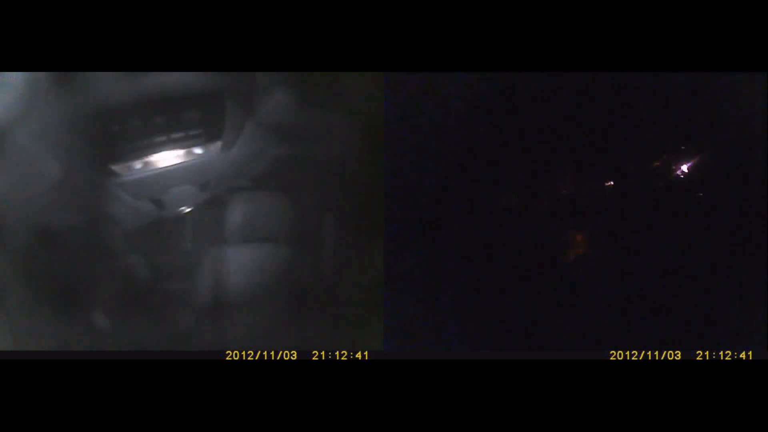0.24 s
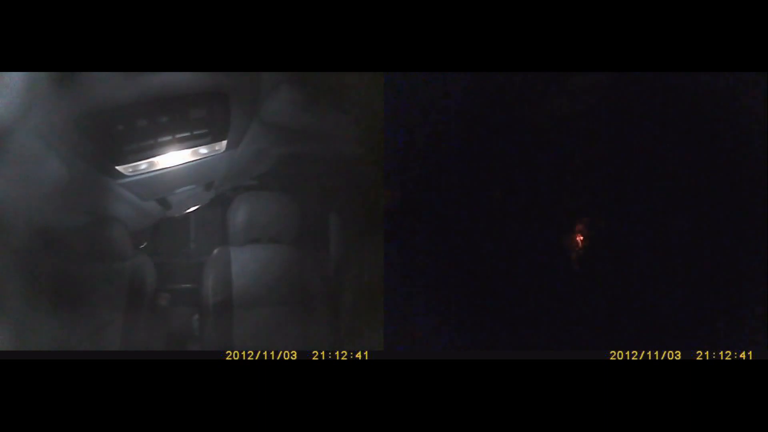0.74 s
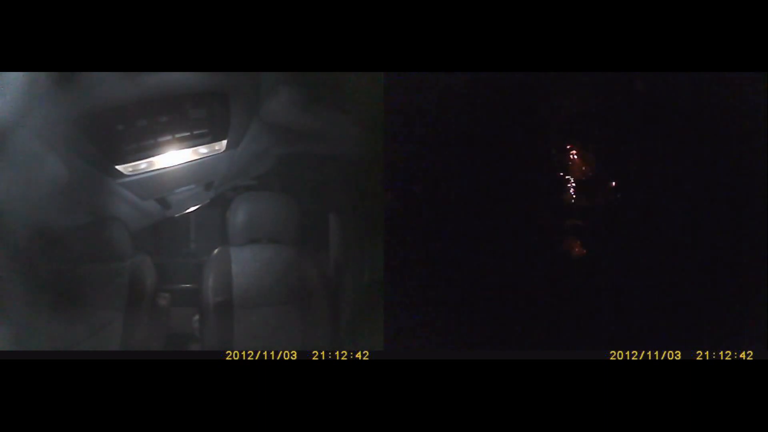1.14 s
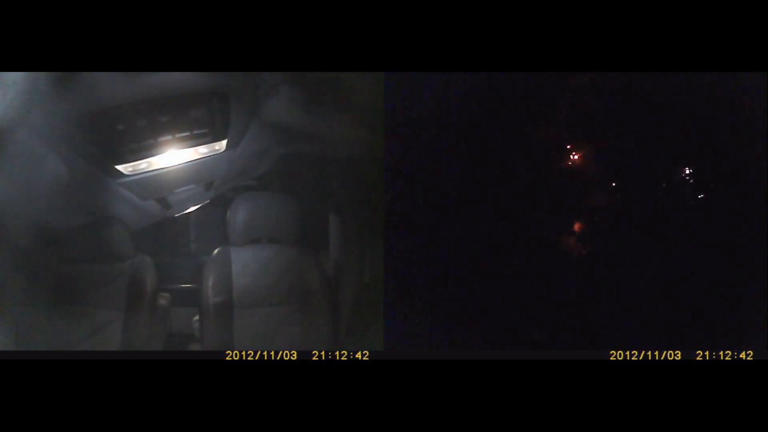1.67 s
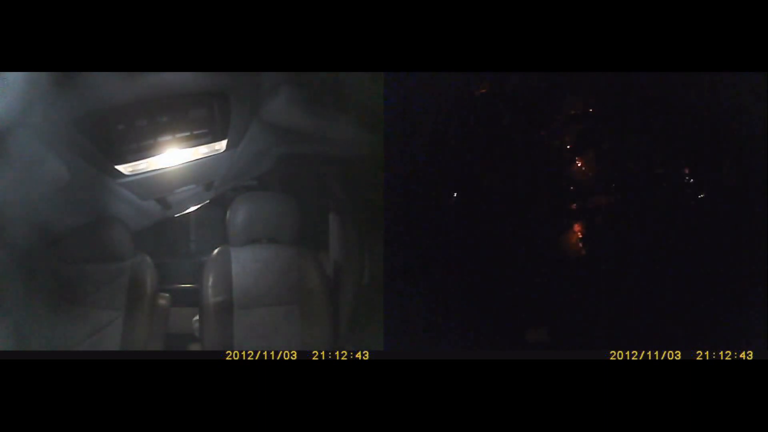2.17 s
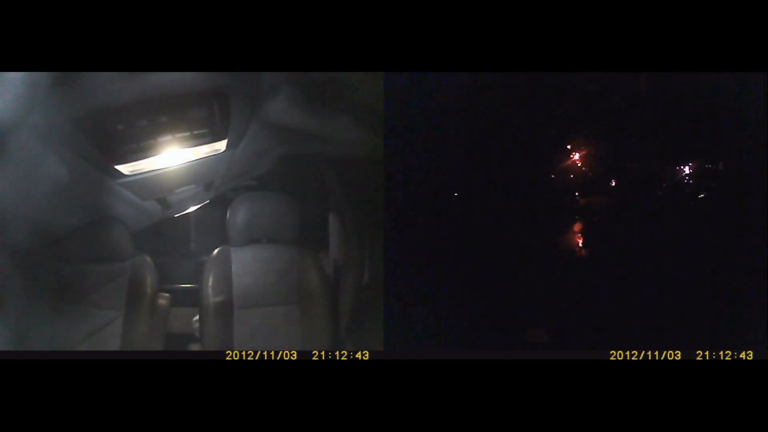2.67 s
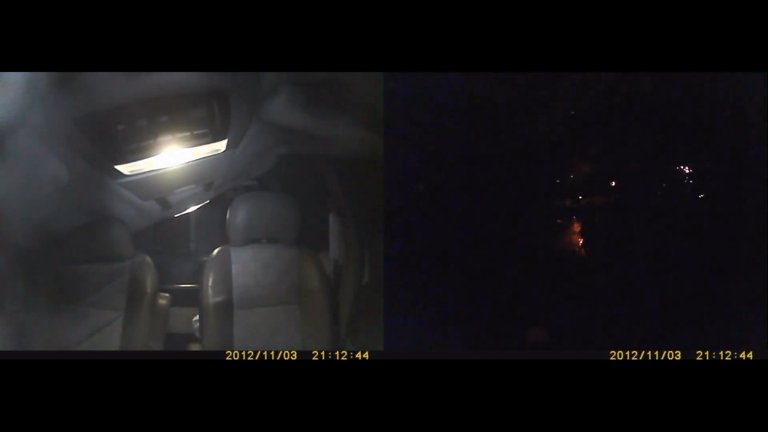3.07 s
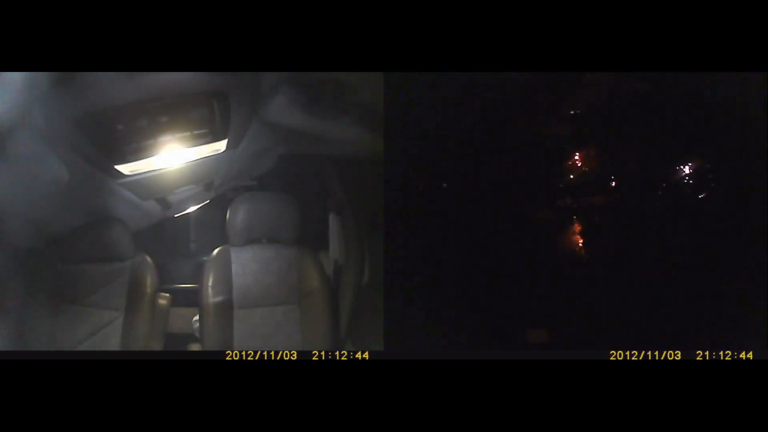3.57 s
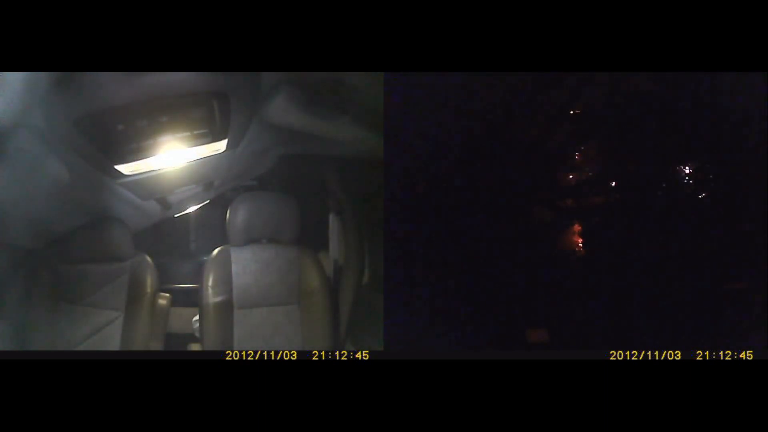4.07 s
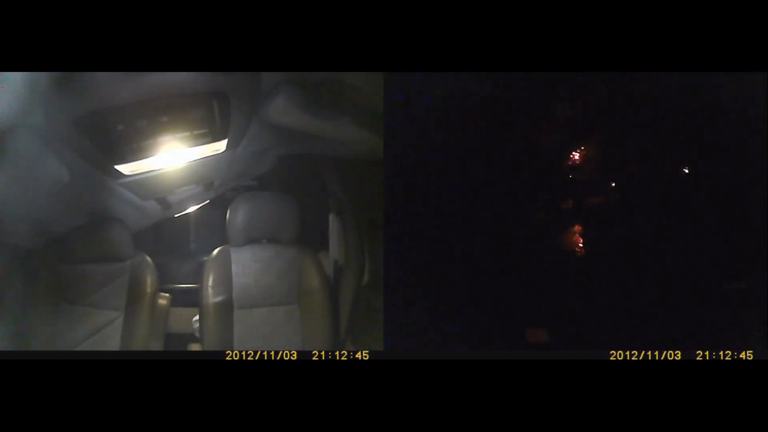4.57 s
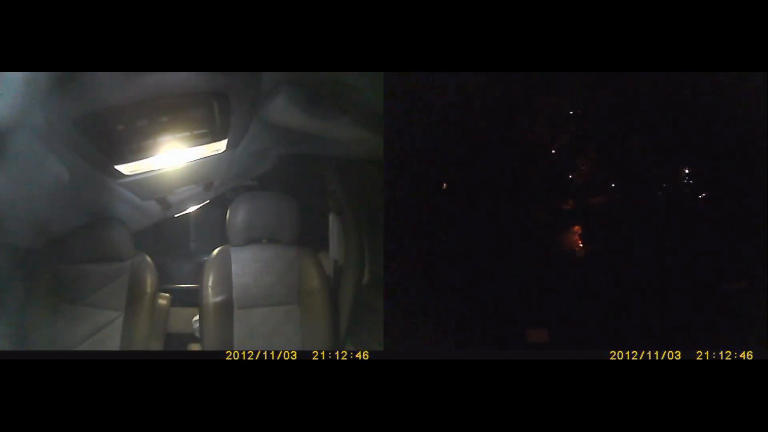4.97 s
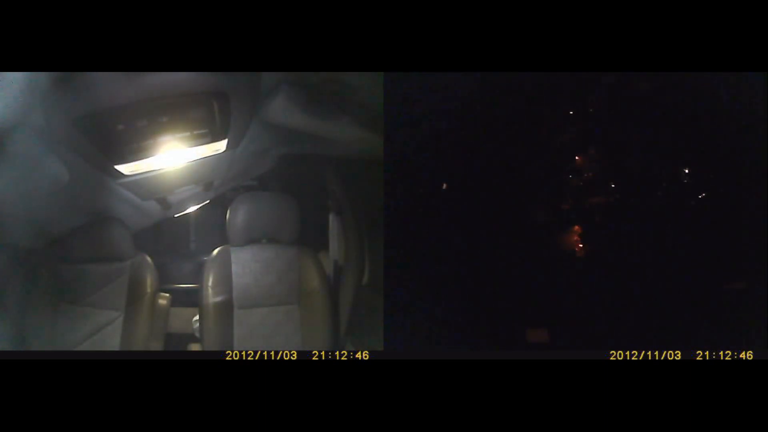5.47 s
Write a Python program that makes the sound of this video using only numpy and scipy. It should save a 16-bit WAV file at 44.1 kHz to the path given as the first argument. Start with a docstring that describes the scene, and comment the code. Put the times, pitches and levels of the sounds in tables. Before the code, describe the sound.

The microphone in the vehicle cabin is slammed straight away by splintering wood and crushing metal, breaking up in bursts. Dense battering on the panels follows, then isolated hollow bangs with short metallic rings. Scraping boughs slide and die down. Small knocks and ticks continue, with one harder hit late on, against dark wind, a faint bright patter that eases, and a low gust near the end.

```python
"""A tree crashes onto a van in a storm: dense noise grains crunch and splinter, heard inside the cabin.
The caving roof squeezes the cabin air and pins the microphone against its limit,
so the crash breaks through in ragged bursts. Limbs boom and clang as struck panels and ringing modes.
Branches scrape and settle as patchy noise; twigs and heavy drops tick and knock on the body.
Behind them is muffled wind, with one late gust and a fine patter of rain that eases off."""
import sys
import numpy as np
from scipy import signal
from scipy.fft import rfft, irfft
from scipy.io import wavfile
from scipy.ndimage import uniform_filter1d

SR = 44100
rng = np.random.default_rng(int(sys.argv[2]) if len(sys.argv) > 2 else 0)


def digitize_waveform(pressure):
    """Quantize a signal to 16-bit integers and store it at the path in sys.argv[1].

    Rows of a 2-D input are taken as channels; values are limited to [-1, 1].
    """
    field = np.atleast_2d(pressure).T
    bounded = np.clip(field, -1, 1)
    quanta = np.round(bounded * 32767).astype(np.int16)
    wavfile.write(sys.argv[1], SR, quanta)


N = 252693
TIME = np.arange(N) / SR  # s
STRIKE_TIME = np.arange(SR // 4) / SR  # s, the length of one struck sound
EDGE_HZ = 10420  # top of the microphone's band


def crash():
    """The falling tree: wood and metal break up on top of the slow pressure of the caving roof."""
    return crunch() + splinters() + snaps() + pressure()


def crunch():
    """Wood and sheet metal crush in countless small breaks, in three overlapping falls."""
    # first boughs, then the trunk, then the crown: start_s, level_db, hold_s, t60_s
    falls = [(0.016, 2.1, 0.34, 0.26), (0.411, -5, 0.21, 0.64), (0.756, -13.5, 0.18, 0.56)]
    # colour of the crunch: frequency_hz, level_db (per Hz, relative)
    crunch_spectrum = [(12, -40.5), (20, -9), (152, -5), (219, -9), (291, -1), (340, -8.5), (441, -5),
                       (705, -8.5), (1070, -14), (1280, -14.5), (1710, -33), (3920, -38), (4470, -37),
                       (4960, -44), (10000, -49.5), (13000, -90), (22000, -120)]
    rise_s, sag_db_per_s = 0.085, 9
    body_hz, body_full_s = 414, 0.57
    force = sum(swell(s, db, rise_s, hold, t60, sag_db_per_s) for s, db, hold, t60 in falls)
    breaks = grains(per_s=800, spread_db=2.6, wash=.7) * amp(1.2 * drift(hz=30))
    breaks = patchy(breaks, depth_db=2.5, length_s=0.029, width_hz=310)
    out = colour(breaks, crunch_spectrum) * force
    # the low body fills in as the trunk bears down
    missing_body = np.clip(1 - (TIME / body_full_s) ** 2, 0, 1)
    return out - dulled(out, body_hz, order=1) * missing_body


def splinters():
    """Wood fibres tear for as long as the tree is coming down, and shake the bright cabin trim."""
    fibres = grains(per_s=300, spread_db=3.5, wash=.3) * amp(2.5 * drift(hz=20))
    gain = swell(0, db=-38, rise_s=0.026, hold_s=0.89, t60=1.07)
    return evened(trim(fibres, 4200)) * gain


def snaps():
    """The first branches snap against the roof, each a very short pulse of pressure."""
    # start_s, peak_db
    first_snaps = [(.017, 8), (.039, 9.5), (.064, 5), (.073, 5)]
    out = np.zeros(N)
    for s, db in first_snaps:
        add(out, s, -amp(db) * signal.windows.hann(14))
    return out


def pressure():
    """The caving roof squeezes the cabin air; strong heaves keep the crunch from swinging the mic back."""
    # surges of cabin pressure: start_s, end_s
    heaves = [(-.02, .073), (.082, .104), (.124, .138), (.148, .167), (.183, .194), (.206, .213),
              (.229, .235), (.313, .331), (.378, .385), (.399, .419)]
    # pressures before easing, in the units of the dry signal
    heave_pressure, jolt_pressure, load_pressure = 2.2, 0.96, 0.26
    jolt_end_s, load_end_s, ease_s = 0.3, 0.69, 0.36

    def until(end_s):
        return np.clip((end_s - TIME) / ease_s, 0, 1)

    heaving = sum((TIME > start) & (TIME < end) for start, end in heaves) * 1.
    surge = heave_pressure * uniform_filter1d(heaving, size=220)  # edges smoothed over 5 ms
    # the first jolt, then the weight of the tree
    return surge + jolt_pressure * until(jolt_end_s) + load_pressure * until(load_end_s)


def battering(count=26):
    """Boughs batter the sheet metal in overlapping knocks, each on another spot with a crack of wood."""
    from_s, to_s = .43, 1.03
    level_db, fade_db_per_s, crack_db = -5.5, 14.5, -18  # crack relative to its knock
    out = np.zeros(N)
    for k, (late, spot, softness) in enumerate(rng.random((count, 3))):
        after_s = (k + late) / count * (to_s - from_s)
        knock = blow(700 * 2 ** spot, octaves=0.45, t60=0.044, rise=.001)
        knock += amp(crack_db) * crack(t60=0.077, ring_db=-5.5, hz=4200, tail_db=-6)
        add(out, from_s + after_s, amp(level_db - fade_db_per_s * after_s - 10 * softness) * knock)
    return out


def limbs():
    """Heavy wood strikes the roof: a boom of panels, a clang of modes, a crack of contact and a low thump."""
    # start_s, boom_db, ring_hz, t60_s, clang_db, clang_hz, crack_db, thump_db
    limb_strikes = [(.42, -14, 1000, 0.042, -10.5, 890, -24.5, -27),
                    (.452, -10, 1000, 0.094, 8.5, 502, -50, -25),
                    (.515, -5, 900, 0.33, -4, 794, -29.5, -24),
                    (0.569, -2.5, 463, 0.23, 0.5, 455, -25.5, -15),
                    (.615, -2, 350, 0.16, -13, 455, -18, -0.5), (.655, -10.5, 450, 0.11, -7, 586, -23, -15),
                    (.703, -0.5, 750, 0.089, 3, 740, -30, -17), (.808, -8, 754, 0.21, -2.5, 773, -42, -20),
                    (.849, -3, 750, 0.2, -9, 840, -22, -26), (.909, -11.5, 702, .11, -4.5, 750, -21.5, -28),
                    (.973, -8.5, 705, 0.16, -24, 840, -33, -31),
                    (1.017, -4.5, 580, 0.11, -4, 595, -28.5, -9.5),
                    (1.282, -4, 880, 0.078, -13, 880, -31, -10),
                    (1.472, -2, 850, .14, 6.5, 430, -21.5, 0.5),
                    (1.684, -21.5, 366, .06, -17, 455, -46, -28),
                    (2.061, -4, 1150, 0.027, -9.5, 1290, -31.5, -29),
                    (2.072, 3.5, 1200, 0.046, -1.5, 1410, -25.5, -14),
                    (2.111, -7.5, 560, .08, -25.5, 457, -39, -28),
                    (2.324, -17, 704, 0.1, -22, 730, -47, -40),
                    (2.499, -15.5, 275, 0.11, -26, 445, -57, -30),
                    (2.802, -20, 622, 0.13, -18, 592, -54, -56),
                    (3.66, -1.5, 1360, 0.037, -4, 685, -25.5, -19)]
    # a harder limb rings more of the roof: width of its ring at 0 dB, and the dB that double it
    width_octaves, widen_db = 1.38, 7
    out = np.zeros(N)
    for s, boom_db, ring_hz, t60, clang_db, clang_hz, crack_db, thump_db in limb_strikes:
        octaves = width_octaves * 2 ** (boom_db / widen_db)
        add(out, s, amp(boom_db) * blow(ring_hz, octaves, t60, rise=0.0037, sag=4.43))
        add(out, s, amp(clang_db) * clang(clang_hz, octaves=0.22))
        add(out, s, amp(crack_db) * crack(t60=0.059, ring_db=-8.5, hz=3080, tail_db=-7.5))
        add(out, s, amp(thump_db) * thump(hz=33.6, t60=0.077))
    return out


def branches():
    """Boughs rumble as they slide on the roof while their twigs scratch the paint in fits and starts."""
    # slides: start_s, level_db, hold_s, t60_s, scrape_db (relative to the rumble)
    slides = [(0.721, -25, 0.47, 0.69, -20.5), (1.304, -22.5, 0.026, 2.97, -25),
              (2.033, -23.5, 0.038, 1.63, -23.5), (2.673, -40.5, 0.14, 16, -30)]
    # colour of the rumble: frequency_hz, level_db (per Hz, relative)
    rumble_spectrum = [(12, -23), (20, 0), (38, -2.5), (65, -11), (117, -3.5), (263, -3.5), (340, -10.5),
                       (456, -5.5), (534, -5.5), (963, -13), (1430, -24.5), (1700, -37.5), (2200, -38),
                       (2860, -74), (4840, -120)]
    # colour of the scrape: frequency_hz, level_db (per Hz, relative)
    scrape_spectrum = [(1060, -43.5), (1800, 3.5), (2670, -3.5), (3530, 5), (3820, -7), (4450, -1.5),
                       (4990, -4), (9110, -11.5), (11000, -44)]
    rise_s = 0.043
    gains = np.array([swell(s, db, rise_s, hold, t60) for s, db, hold, t60, _ in slides])
    scrape_shares = amp([[row[-1]] for row in slides])
    # separate slides add up in energy
    sliding = np.linalg.norm(gains, axis=0)
    scraping = np.linalg.norm(gains * scrape_shares, axis=0)
    # rumble and scrape share the same jolts
    jolt = drift(hz=25)
    bumps = grains(per_s=450, spread_db=2.5, wash=.8) * amp(1.2 * jolt)
    scratches = grains(per_s=260, spread_db=3, wash=.7) * amp(2 * jolt)
    scratches = patchy(cabin(scratches), depth_db=6.5, length_s=0.09, width_hz=400)
    scrape = colour(scratches, scrape_spectrum)
    # a light touch makes hardly any treble
    bite = np.sqrt(scraping / scraping.max())
    # filtered forwards and backwards, so that the soft part stays in phase
    soft = dulled(scrape, 5000, order=4)
    soft = dulled(soft[::-1], 5000, order=4)[::-1]
    return sliding * colour(bumps, rumble_spectrum) + scraping * (soft + bite * (scrape - soft))


def twigs():
    """Twigs and heavy drops tick sharply as the panel swells in answer; debris skitters between them."""
    # twigs and drops: start_s, knock_db (base of boom and clang), ring_hz, tick_db, treble_edge_hz
    light_knocks = [(1.127, -18, 780, -44, 6000), (1.175, -18.5, 780, -37, 6000),
                    (1.299, -24.5, 900, -30, 7000), (1.441, -25, 600, -35, 8000),
                    (1.629, -21.5, 1080, -43.5, 5000), (1.869, -26, 970, -42, 8000),
                    (1.909, -22, 1000, -42, 5000), (2.173, -21.5, 765, -45, 8000),
                    (2.228, -23, 650, -44, 7000), (2.253, -27.5, 900, -39.5, 9000),
                    (2.301, -17.5, 880, -33, 7040), (2.362, -21.5, 646, -57, 5020),
                    (2.485, -23, 680, -39.5, 9000), (2.577, -37, 1000, -44, 7000),
                    (2.68, -20, 706, -33, 7300), (2.714, -21, 930, -47, 4000),
                    (2.771, -24.5, 860, -36.5, 7260), (3.026, -31.5, 750, -65, 3960),
                    (3.161, -37, 645, -43.5, 5000), (3.353, -17.5, 900, -27.5, 4800),
                    (3.537, -24, 900, -37.5, 5750), (3.628, -34, 670, -38.5, 4600),
                    (4.073, -30, 1050, -60, 4000), (4.265, -39, 700, -51.5, 4800),
                    (4.306, -33.5, 805, -45, 5100), (4.416, -32, 920, -45.5, 5000),
                    (4.539, -26, 900, -40.5, 5370), (4.646, -35, 730, -50, 5000),
                    (4.812, -30, 830, -54, 4500), (5.11, -26, 830, -34, 5840),
                    (5.21, -37.5, 1036, -57, 4000), (5.423, -30.5, 680, -42, 5340),
                    (5.53, -37, 900, -64, 4000)]
    # bits of bark and debris after the blows: start_s, tick_db
    skitters = [(1.253, -43), (1.345, -39.5), (1.361, -47.5), (1.377, -46), (1.425, -53), (1.801, -50.5),
                (2.138, -42), (2.469, -48)]
    boom_db, clang_db = 2, 0.5  # relative to the knock
    out = np.zeros(N)
    for s, knock_db, ring_hz, tick_db, edge_hz in light_knocks:
        boom = blow(ring_hz, octaves=0.71, t60=0.074, rise=0.0044)
        add(out, s, amp(knock_db + boom_db) * boom)
        add(out, s, amp(knock_db + clang_db) * clang(ring_hz, octaves=0.57))
        tick = crack(t60=0.016, ring_db=-7, hz=rng.uniform(3200, 4600), tail_db=-6)
        add(out, s, amp(tick_db) * dulled(tick, edge_hz, order=3))
    for s, tick_db in skitters:
        add(out, s, amp(tick_db) * crack(t60=0.025, ring_db=-16, hz=3800, tail_db=1))
    return out


def storm():
    """The background weather: wind, its buffeting of the van, and fine rain."""
    return wind() + buffeting() + rain()


def wind():
    """Wind roars through the closed body as dark noise, its level wandering a little."""
    # colour of the wind: frequency_hz, level_db (per Hz, relative)
    wind_spectrum = [(12, -33), (20, -18.5), (167, -13), (234, -5), (314, -10.5), (456, -12), (676, -14.5),
                     (1040, -24.5), (1430, -33), (1570, -44.5), (2200, -45), (2860, -68), (4840, -120)]
    level_db = -41.5 - 1.35 * drift(hz=0.98)
    eddies = grains(per_s=600, spread_db=2.5, wash=1.6) * amp(.6 * drift(hz=14))
    eddies = patchy(eddies, depth_db=-1.0, length_s=0.029, width_hz=150)
    return colour(eddies, wind_spectrum) * amp(level_db)


def buffeting():
    """Very low noise from the wind pushing on the body; one gust rocks the van."""
    gust_s, gust_width_s, gust_db = 5.38, 0.11, 9
    level_db = -50.5 + gust_db * np.exp(-((TIME - gust_s) / gust_width_s) ** 2)
    # frequency_hz, level_db (per Hz, relative)
    spectrum = [(15, -16.0), (42, -6.5), (70, -20.0), (140, -14.5), (260, -39.0), (900, -98.0)]
    return colour(rng.standard_normal(N), spectrum) * amp(level_db)


def rain():
    """Fine rain patters on the glass as small bright grains, and steadily eases off."""
    # colour of the patter: frequency_hz, level_db (per Hz, relative)
    patter_spectrum = [(1100, -23), (1700, -7.5), (3500, -5), (4000, -15.5), (4500, -2.5), (5100, -21.5),
                       (13000, -53)]
    middle_db, ease_db_per_s = -62.5, 2.5  # level midway through the scene
    drops = grains(per_s=120, spread_db=2.5, wash=1.3) * amp(1.2 * drift(hz=9))
    drops = patchy(cabin(drops), depth_db=3.5, length_s=0.055, width_hz=400)
    level_db = middle_db - ease_db_per_s * (TIME - TIME.mean())
    return colour(drops, patter_spectrum) * amp(level_db)


def blow(ring_hz, octaves, t60, rise, sag=0):
    """A struck panel: resonances near ring_hz swell and die, sinking by sag octaves/s as it dents."""
    # resonances of the body panels: frequency_hz, width_hz, level_db
    panel_modes = [(260, 55, 3), (457.8, 2.1, 9), (583, 9.8, -0.5), (740, 47, -4), (998, 8.2, -0.5),
                   (1270, 9.7, -3.5)]
    t = STRIKE_TIME
    hz = bins(t)
    panels = np.sqrt(sum(amp(db) ** 2 / (1 + ((hz - f) / width) ** 2) for f, width, db in panel_modes))
    near = 1 / (1 + (np.log2(hz / ring_hz) / max(octaves, .1)) ** 2)
    lining = 1 / np.sqrt(1 + (hz / 1550) ** 14)  # the roof lining soaks up the treble
    random_phase = np.exp(2j * np.pi * rng.random(len(hz)))
    field = signal.hilbert(irfft(panels * near * lining * random_phase, len(t)))
    # the same energy sloshes between the modes, so the ring holds steady as it decays
    field /= np.sqrt(uniform_filter1d(abs(field) ** 2, size=260) / 2 + 1e-20)
    slowed_time = np.cumsum(2 ** (-sag * t)) / SR
    ring = np.interp(slowed_time, t, field.real)
    return ring * (1 - np.exp(-t / rise)) * amp(-60 * t / max(t60, .01))


def clang(near_hz, octaves):
    """The roof's modes ring as clear tones; each spot favours those near one pitch, slightly detuned."""
    # clear modes of the sheet-metal roof: frequency_hz, level_db, t60_s
    roof_modes = [(452.3, 7.5, 0.097), (595, 0, 0.088), (721.4, -1, 0.059), (828, -4.5, 0.078),
                  (988, 5.5, 0.056), (1315, -6.5, 0.057)]
    t = STRIKE_TIME
    hz, db, t60 = np.transpose(roof_modes)[:, :, None]
    detune, sign = rng.uniform(-1.3, 1, (2, len(hz), 1))
    share = amp(db) / (1 + (np.log2(hz / near_hz) / octaves) ** 2)
    tuned_hz = hz * (1 + 0.02 * detune)
    tones = np.sign(sign) * np.sin(2 * np.pi * tuned_hz * t) * amp(-60 * t / t60)
    return (share * tones).sum(0) / np.linalg.norm(share) * (1 - np.exp(-t / 0.0014))


def crack(t60, ring_db, hz, tail_db):
    """The snap of contact, brightest near hz: it chatters briefly, leaving a cabin tail and ringing trim."""
    # colour of a tick: frequency_hz, level_db (per Hz, relative)
    tick_spectrum = [(880, -11.5), (1350, 12), (1810, -5.5), (2640, -4.5), (3090, -3), (3620, -6.5),
                     (3950, -8), (4590, -6.5), (5880, -12.5), (10000, -15.5), (13000, -52), (22000, -120)]
    hold_s, tail_t60_s, own_octaves = .005, .1, 2.8
    t = STRIKE_TIME
    chatter = amp(3.5 * evened(uniform_filter1d(rng.standard_normal(len(t)), size=70)))
    contact = amp(-60 * np.maximum(t - hold_s, 0) / t60)
    tail = amp(tail_db - 60 * t / tail_t60_s)
    fade = chatter * (contact + tail) * (1 - np.exp(-t / 0.00014))
    own_colour = 1 / np.sqrt(1 + (np.log2(bins(t) / hz) / own_octaves) ** 2)
    noise = irfft(rfft(rng.standard_normal(len(t))) * own_colour, len(t))
    snap = colour(noise, tick_spectrum) * fade
    sound = snap + amp(ring_db) * trim(snap, hz)
    return sound / np.sqrt(np.mean(sound[t < .01] ** 2))  # unit level over the first 10 ms


def thump(hz, t60):
    """The whole roof flexes and pushes on the cabin air as a fast-dying low tone, with a dull shudder."""
    t = STRIKE_TIME
    # frequency_hz, level_db (per Hz, relative)
    spectrum = [(15, -12), (45, -6.0), (130, -4.5), (220, -9.0), (500, -65), (2000, -110)]
    shudder = colour(rng.standard_normal(len(t)), spectrum)
    flex = np.sin(2 * np.pi * hz * t)
    return (flex + amp(-2.0) * shudder) * amp(-60 * t / t60) * (1 - np.exp(-t / 0.00076))


def trim(x, favoured_hz):
    """What the trim rings with when x shakes it; each spot favours the resonances near one pitch."""
    # bright resonances of the cabin trim: frequency_hz, width_hz, level_db
    trim_modes = [(2680, 200, 12), (3580, 300, 11.5), (4380, 156, 16.5)]
    out = np.zeros(len(x))
    for hz, width, db in trim_modes:
        weight = 1 / (1 + (np.log2(hz / favoured_hz) / 0.52) ** 2)
        out += amp(db) * weight * signal.lfilter(*signal.iirpeak(hz, hz / width, SR), x)
    return out


def cabin(x):
    """Close reflections inside the cabin blur each snap: a decaying noise echo with a t60 of 30 ms."""
    reflections = rng.standard_normal(2048) * amp(-60 * TIME[:2048] / .03)
    return evened(signal.oaconvolve(x, reflections)[:N])


def grains(per_s, spread_db, wash):
    """Countless small snaps of uneven size over a smooth wash of noise."""
    size = amp(spread_db * np.minimum(rng.exponential(1, N), 4))
    pulses = size * rng.choice([-1, 1], N) * (rng.random(N) < per_s / SR)
    return evened(evened(pulses) + wash * rng.standard_normal(N))


def patchy(x, depth_db, length_s, width_hz):
    """Lets each part of the spectrum surge and sink on its own, as the contact points shift."""
    z = signal.stft(x, nperseg=512)[2]
    field = rng.standard_normal(z.shape[::-1]).T
    # smooth the random gains along frequency, then along time
    for axis, spread in enumerate([width_hz * 512 / SR, length_s * SR / 256]):
        smoother = np.expand_dims(signal.windows.gaussian(41, spread / 2), 1 - axis)
        field = signal.fftconvolve(field, smoother, "same")
    gain = amp(depth_db * np.clip(evened(field), -2, 2))
    return evened(signal.istft(z * gain)[1][:len(x)])


def drift(hz):
    """Slow chance of unit size, with wiggles up to about hz a second."""
    white = rng.standard_normal(N)
    return evened(irfft(rfft(white) / (1 + (bins(white) / hz) ** 4), N))


def swell(start, db, rise_s, hold_s, t60, sag_db_per_s=0):
    """A gain that rises to db, holds while sagging slowly, then dies away."""
    held = np.maximum(TIME - start - rise_s, 0)
    fall_db = sag_db_per_s * held + 60 * np.maximum(held - hold_s, 0) / t60
    return np.clip((TIME - start) / rise_s, 0, 1) * amp(db - fall_db)


def colour(x, spectrum):
    """Gives x a spectrum of (Hz, dB) points, at unit level."""
    hz, db = np.transpose(spectrum)
    gain = amp(np.interp(np.log(bins(x)), np.log(hz + 1), db))
    return evened(irfft(rfft(x) * gain, len(x)))


def dulled(x, edge_hz, order):
    """Rolls off the treble above edge_hz."""
    return signal.sosfilt(signal.butter(order, min(edge_hz, EDGE_HZ), fs=SR, output="sos"), x)


def above(x, hz, order):
    """Rolls off everything below hz."""
    return signal.sosfilt(signal.butter(order, hz, "highpass", fs=SR, output="sos"), x)


def amp(db):
    """Amplitude ratio of a level in dB."""
    return 10 ** (np.asarray(db) / 20)


def evened(x):
    """Brings x to unit RMS level."""
    return x / np.sqrt(np.mean(x ** 2) + 1e-20)


def bins(x):
    """Frequencies in Hz of the spectrum of x, kept just above zero."""
    return np.fft.rfftfreq(len(x), 1 / SR) + 1e-3


def add(mix, s, sound):
    """Mixes sound in at s seconds, cut off at the end of the mix."""
    part = mix[max(round(s * SR), 0):][:len(sound)]
    part += sound[:len(part)]


def overload(x, limit):
    """The microphone runs out of travel and flattens the wave, with rounded corners."""
    return x / (1 + abs(x / limit) ** 2.8) ** (1 / 2.8)


def scene():
    """Everything reaches one microphone inside the cabin."""
    sound = crash() + battering() + limbs() + branches() + twigs() + storm()
    return np.array([sound, sound])


def record(dry, limit=0.5, leak_db=-23, sag_hz=0.035, dull_hz=8500):
    """One overloaded, dull microphone: treble leaks past its limit, its offset sags, its band is limited."""
    spread_db, spread_hz, spread_s = -17, 3500, .002
    squashed = dulled(overload(dry, limit), dull_hz, order=1)
    leak = amp(leak_db) * above(dry, 1950, order=2)
    out = above(squashed + leak, sag_hz, order=1)
    # a faint, slightly delayed treble, of opposite sign left and right, widens the sound a little
    delayed = np.interp(TIME - spread_s, TIME, out[0])
    side = amp(spread_db) * above(delayed, spread_hz, order=2)
    out = out * amp([[-.1], [.1]]) + np.array([side, -side])
    band_limit = signal.firwin(401, EDGE_HZ, window=("kaiser", 9), fs=SR)
    return signal.oaconvolve(out, band_limit[None], "same")


dry = scene()
out = record(dry)
digitize_waveform(out)
```